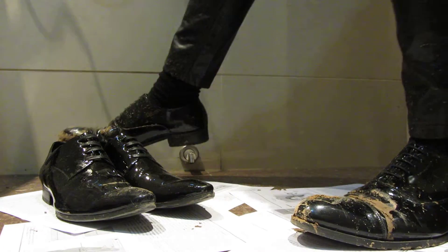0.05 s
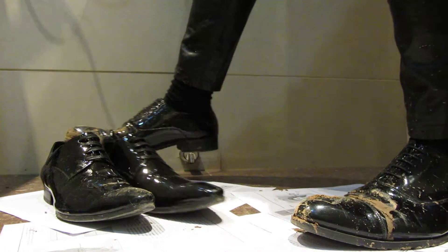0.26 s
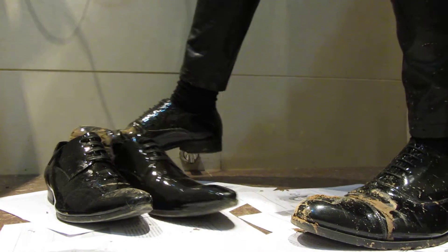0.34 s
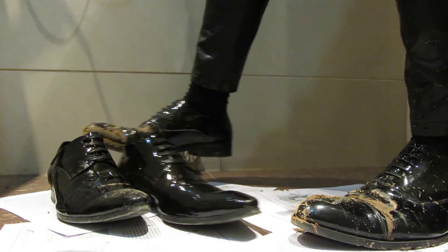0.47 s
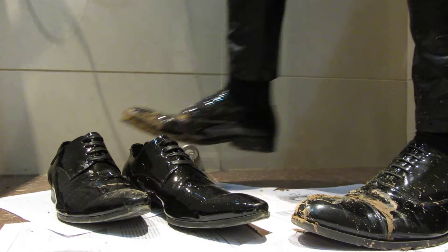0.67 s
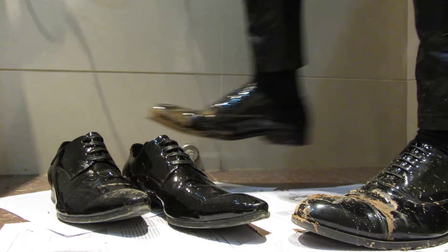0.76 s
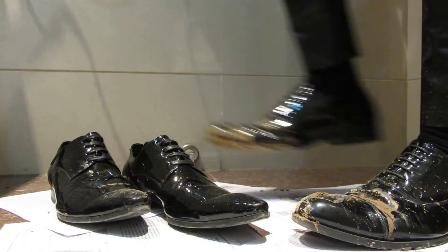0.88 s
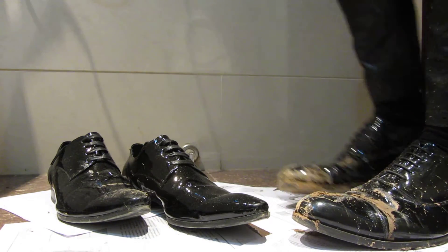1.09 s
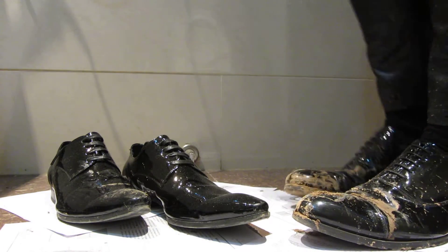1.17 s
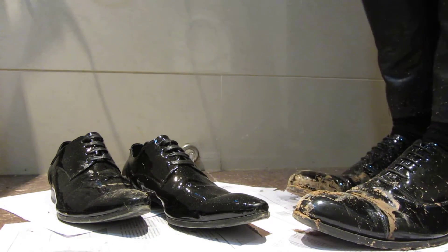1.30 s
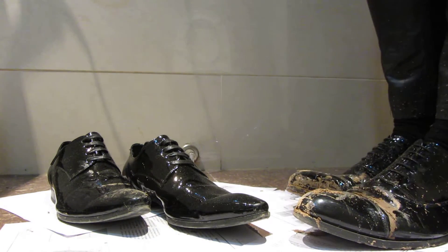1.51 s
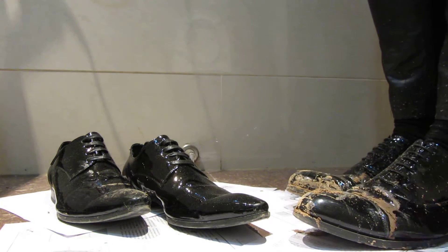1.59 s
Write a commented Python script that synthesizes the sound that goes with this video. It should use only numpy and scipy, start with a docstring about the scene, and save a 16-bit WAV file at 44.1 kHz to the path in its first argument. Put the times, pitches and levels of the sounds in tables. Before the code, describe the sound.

Gritty scrape of one leather shoe across another, followed by a soft footstep on paper.

```python
"""Small tiled room: a muddy leather sole is dragged over the top of an empty shoe. Grit rasps, the
hollow shoe drums under the slips, and the sole judders before it lets go. Trouser cloth swishes, the
foot lands with a soft thud that flutters between the walls, then shuffles on the paper-covered floor.
Crumbs of dry mud tick; a steady hiss lies underneath."""
import sys
import numpy as np
from scipy import signal
from scipy.fft import rfft, irfft, next_fast_len
from scipy.io import wavfile
from scipy.ndimage import map_coordinates

SR = 44100
rng = np.random.default_rng(int(sys.argv[2]) if len(sys.argv) > 2 else 0)


def transcribe(u):
    """Save the signal u as a 16-bit wav file named by the first command-line argument.

    u: samples, shape (n,) or (channels, n), limited to [-1, 1]; the rate is SR.
    q: integer samples, one column per channel.
    """
    v = np.clip(np.atleast_2d(u).T, -1, 1)
    q = np.round(v * 32767).astype(np.int16)
    wavfile.write(sys.argv[1], SR, q)


N = 72765
T = np.arange(N) / SR

# Left-right likeness of friction noise: freq_hz, correlation
FRICTION_ALIKE = [(300, 1), (2000, 0.83), (6000, 0.26), (14000, .3)]


def amp(db):
    """Decibels to gain."""
    return 10 ** (np.asarray(db) / 20)


def unit(x):
    """Scale to rms 1."""
    return x / np.sqrt(np.mean(x ** 2) + 1e-20)


def along(points, hz):
    """Interpolate (freq_hz, value) points on a log axis."""
    f, v = np.transpose(points)
    return np.interp(np.log(hz + 1), np.log(f + 1), v)


def level(rows):
    """Gain per sample from (time_s, level_db) rows, silent outside them."""
    s, db = np.transpose(rows)
    return amp(np.interp(T, s, db)) * (T > s[0]) * (T < s[-1])


def hump(peak_s, rise_s, fall_s):
    """Gaussian rise to 1 and fall."""
    return np.exp(-((T - peak_s) / np.where(T < peak_s, rise_s, fall_s)) ** 2)


def swells(rows):
    """Summed gain of short strokes."""
    return sum(amp(db) * hump(s, rise, fall) for s, rise, fall, db in rows)


def wobble(knots_per_s):
    """Smooth random curve."""
    return map_coordinates(rng.standard_normal(4096), [T * knots_per_s + 2], mode="wrap")


def grains(per_s):
    """Tiny contacts at random moments, with two sets of random sizes."""
    return (rng.random(N) < per_s / SR) * rng.standard_normal((2, N))


def filtered(x, response):
    """Apply a complex frequency response."""
    m = next_fast_len(N + SR // 2)
    return irfft(rfft(x, m) * response(np.fft.rfftfreq(m, 1 / SR)), m)[..., :N]


def resonances(modes, f):
    """Response of (freq_hz, width_hz, gain_db) modes, alternating in sign."""
    return sum((-1) ** k * amp(db) * 1j * f * width / (hz * hz - f * f + 1j * f * width)
               for k, (hz, width, db) in enumerate(modes))


def spread(pair, spectrum, alike=FRICTION_ALIKE):
    """Two unrelated signals to one coloured stereo sound of rms 1."""
    def mid_side(hz):
        turn = np.arccos(np.clip(along(alike, hz), -1, 1)) / 2
        return amp(along(spectrum, hz)) * [np.cos(turn), np.sin(turn)]
    mid, side = filtered(pair, mid_side)
    return unit(np.array([mid + side, mid - side]))


def placed(x, left_db, lead_s):
    """Pan by the left channel's level and time lead over the right."""
    half = np.array([[1], [-1]]) / 2
    return filtered(x, lambda hz: amp(half * left_db) * np.exp(2j * np.pi * hz * half * lead_s))


def room(x, wet_db, alike=0.39, count=3, change_s=.035):
    """Direct sound plus reverberation; noise tails crossfade in turn to keep it smooth, uncoloured."""
    # Room decay: freq_hz, t60_s
    decay = [(100, 0.9), (250, 0.51), (500, 0.51), (1000, 0.35), (4000, 0.3), (8000, 0.33), (13000, 0.16)]
    hz, t, noise = signal.stft(rng.standard_normal((2, count, SR * 3 // 4)), SR, nperseg=256)
    mid, side = signal.istft(noise * amp(-60 * t / along(decay, hz)[:, None]), SR, nperseg=256)[1]
    turn = np.arccos(alike) / 2
    tails = np.cos(turn) * mid + np.sin(turn) * np.array([side, -side])
    tails = np.pad(tails / np.linalg.norm(tails[0, 0]), ((0, 0), (0, 0), (200, 0)))  # pre-delay
    share = np.sin(np.pi / 2 * np.minimum((T / change_s + np.arange(count)[:, None]) % count, 2))
    wet = signal.fftconvolve(np.atleast_2d(x)[:, None] * share, tails, axes=2).sum(1)[:, :N]
    return x + amp(wet_db) * wet


def air(level_db=-44.5):
    """Steady hiss and hum of the room."""
    # Room noise: freq_hz, density_db
    spectrum = [(20, -50), (40, -33), (60, -3), (82, 3), (115, -2.5), (150, -1.5), (200, 3.5), (260, -2),
                (350, -9), (550, -6), (1000, -12), (1900, -11.5), (2900, -12.5), (3900, -20), (5500, -15),
                (7500, -20.5), (10000, -29.5), (12000, -38), (14000, -33.5), (15500, -40)]
    # Left-right likeness: freq_hz, correlation
    alike = [(30, -0.88), (70, -0.8), (150, -0.7), (500, -0.15), (2000, 0.14), (6000, 0.11),
             (14000, -0.017)]
    return amp(level_db) * spread(rng.standard_normal((2, N)), spectrum, alike)


def crumbs(tick_t60_s=0.03):
    """Crumbs of dry mud tick and crackle under the sole."""
    # Single ticks: start_s, level_db
    ticks = [(.032, -49), (1.444, -43), (1.543, -46)]
    # Crackling: peak_s, rise_s, fall_s, level_db
    crackles = [(1.39, 0.044, 0.034, -55)]
    # Crumb colour: freq_hz, gain_db
    spectrum = [(300, -14), (2000, -8), (7000, 15), (10000, 11), (15000, -3)]
    decays = sum((T > s) * amp(db - 60 * np.abs(T - s) / tick_t60_s) for s, db in ticks)
    return (decays + swells(crackles)) * spread(rng.standard_normal((2, N)), spectrum)


def drumming(low_cut_hz=150, high_cut_hz=1200, side_db=-9):
    """Uneven slips ring the hollow shoe, whose two flanks radiate a little differently."""
    # Empty shoe's modes: freq_hz, width_hz, gain_db
    shoe = [(266.2, 24, -5.5), (344, 42, -10.5), (438, 18.6, 2), (463, 9.2, -1), (508, 16, -6),
            (547, 19, -3), (588, 35, -6), (695, 100, -12.5), (880, 44, -11.5), (981, 12.4, -4),
            (1032, 36, -11)]
    # Drumming over the stroke: time_s, level_db
    stroke = [(.11, -81), (.14, -44), (.155, -36.5), (.175, -35), (.21, -43.5), (.25, -37.5), (.3, -29.5),
              (.365, -50), (.38, -35), (.42, -24), (.45, -23.5), (.52, -28), (.56, -36), (.6, -47),
              (.65, -77)]
    band = lambda f: (1 - 1 / (1 + (f / low_cut_hz) ** 6)) / (1 + (f / high_cut_hz) ** 12)
    ring = filtered(grains(per_s=1500), lambda f: resonances(shoe, f) * band(f))
    effort = level(stroke)
    mid, side = (unit(part * effort) * np.sqrt(np.mean(effort ** 2)) for part in ring)
    return room(mid + amp(side_db) * np.array([side, -side]), wet_db=-3)


def rasp(gain_db=-1, clump_db=1.58, clumps_per_s=220, split_hz=4860, tilt_db_per_s=16.5, flat_s=0.48):
    """Dried mud grinds between sole and leather, brighter as the sole speeds up."""
    # Rasp over the stroke: time_s, level_db
    stroke = [(.12, -68), (.144, -50), (.154, -37.5), (.19, -38), (.245, -33), (.275, -29.5), (.305, -32.5),
              (.36, -33), (.43, -31), (.51, -32.5), (.56, -39), (.59, -45.5), (.62, -65)]
    # Grit colour: freq_hz, density_db
    spectrum = [(30, -45), (100, -25), (200, -20), (330, -14), (600, -10.5), (980, 4.5), (1150, -2.5),
                (1550, 1), (1850, -0.5), (2200, 0), (2520, 2), (3100, 1), (3800, -2), (5500, 2),
                (8000, -0.5), (10000, -4), (12000, -12), (14000, -10.5), (16000, -16)]
    # Larger crumbs crushed: peak_s, rise_s, fall_s, boost_db
    crunches = [(0.157, .002, 0.012, 0), (.262, 0.0038, 0.017, 2.5), (.294, 0.0096, .006, 1.5),
                (0.491, .004, 0.013, 6)]
    grit = spread(grains(per_s=9000) * amp(clump_db * wobble(clumps_per_s)), spectrum)
    low = filtered(grit, lambda hz: 1 / (1 + (hz / split_hz) ** 4))
    tilt_db = tilt_db_per_s * (np.clip(T, .27, .5) - flat_s)
    tilted = low * amp(-tilt_db) + (grit - low) * amp(tilt_db)
    crunch_db = sum(db * hump(s, rise, fall) for s, rise, fall, db in crunches)
    return room(amp(gain_db + crunch_db) * level(stroke) * tilted, wet_db=-1)


def judder(pitch_wander=0.027, rough_db=1.7):
    """The sole sticks and slips in step with a resonance of the shoe for a few cycles."""
    # Stick-slip bursts: start_s, length_s, pitch_hz, level_db
    bursts = [(.294, 0.038, 449, -30), (0.431, 0.05, 265.5, -30), (0.466, 0.0338, 439.7, -16),
              (.505, 0.026, 453.6, -20), (.512, 0.034, 249.7, -27.5), (.55, .09, 197.4, -40.5),
              (.578, .03, 413.5, -38.5)]
    out = np.zeros(N)
    for start_s, length_s, hz, db in bursts:
        cycles = np.cumsum(hz * (1 + pitch_wander * wobble(119.2)) * (T > start_s)) / SR
        swell = np.abs(np.sin(np.pi * np.clip((T - start_s) / length_s, 0, 1))) ** 0.85
        out += amp(db + rough_db * wobble(220)) * swell * np.sqrt(2) * np.sin(2 * np.pi * cycles)
    return room(out, wet_db=-7)


def cloth():
    """The trouser leg rubs in soft swishes of noise."""
    # Leg movements: peak_s, rise_s, fall_s, level_db
    swishes = [(.7, .06, 0.12, -45), (.83, 0.051, 0.11, -51), (1.07, 0.11, 0.11, -47.5),
               (1.41, 0.074, 0.073, -44)]
    # Cloth colour: freq_hz, gain_db
    spectrum = [(30, -8), (100, 4), (300, -6), (650, 6.5), (1400, 6), (2800, 1.5), (4000, -6), (6000, -2),
                (9000, -9), (15000, -28)]
    return swells(swishes) * spread(rng.standard_normal((2, N)), spectrum)


def step(start_s=1.1542, gain_db=-20, soft_hz=1400, low_cut_hz=130):
    """One soft blow of the sole, returning from the facing walls as a low boom."""
    # Modes of sole on floor: freq_hz, width_hz, gain_db
    sole = [(203, 97, -1.5), (329, 98, 1.5), (490, 260, -5.5), (750, 300, -8), (1140, 280, -25)]
    # Wall returns: delay_s, gain_db
    echoes = [(.021, -4.5), (.046, -12), (.074, -15), (0.099, -16), (.149, -20)]
    # Room modes colouring the returns: freq_hz, width_hz, gain_db
    room_modes = [(184, 27, 10.5), (235, 39, 10), (291, 34, 3.5), (643, 270, -1)]

    def blow(f):
        rounded = (1j * f / (low_cut_hz + 1j * f)) ** 2 / (1 + 1j * f / soft_hz) ** 2
        return resonances(sole, f) * rounded * np.exp(-2j * np.pi * f * start_s)

    def walls(f):
        returns = sum(amp(db) * np.exp(-2j * np.pi * f * delay_s) for delay_s, db in echoes)
        return returns * resonances(room_modes, f)

    thud = filtered(signal.unit_impulse(N), blow)
    thud = amp(gain_db) * thud / np.abs(thud).max()
    both = room(thud, wet_db=-6) + room(filtered(thud, walls), wet_db=-14)
    return placed(both, left_db=-2.5, lead_s=0)


def paper():
    """The sole scuffs the paper in dense tiny contacts."""
    # Scuffs: peak_s, rise_s, fall_s, level_db
    scuffs = [(1.157, .012, 0.018, -38), (1.24, 0.051, 0.075, -41), (1.4, 0.031, 0.059, -50.5)]
    # Paper colour: freq_hz, gain_db
    spectrum = [(30, -12), (150, 10.5), (600, 6), (1500, 3), (3000, 2), (6000, -2), (9000, -5),
                (12000, -20), (15500, -17)]
    return swells(scuffs) * spread(grains(per_s=7000), spectrum)


def scene():
    """Scrape near the centre, footfall a little to the right, hiss all round."""
    scrape = placed(rasp() + drumming() + judder(), left_db=-0.3, lead_s=22e-6)
    footfall = step() + cloth() + room(paper() + crumbs(), wet_db=-3)
    return scrape + placed(footfall, left_db=-1.5, lead_s=-35e-6) + air()


def record(dry):
    """Brick-wall low-pass."""
    return filtered(dry, lambda hz: hz < 15800)


dry = scene()
out = record(dry)
transcribe(out)
```